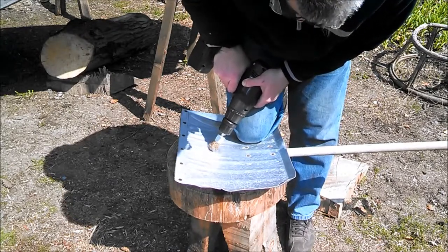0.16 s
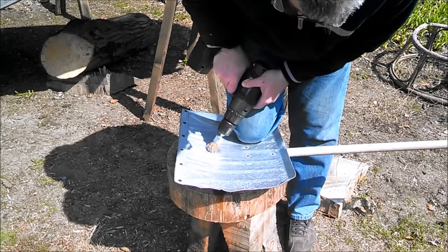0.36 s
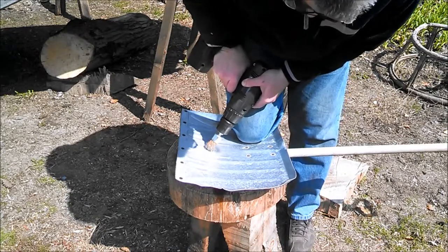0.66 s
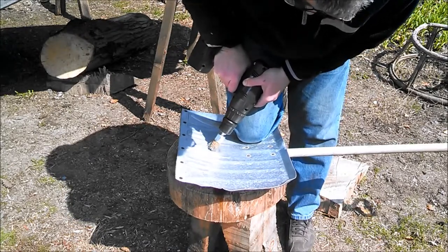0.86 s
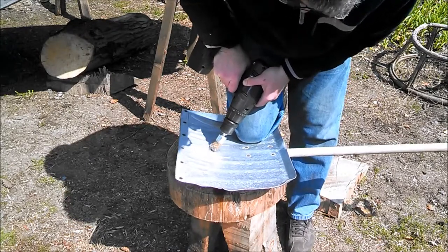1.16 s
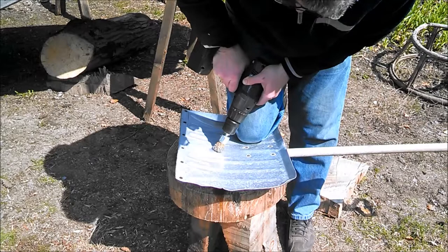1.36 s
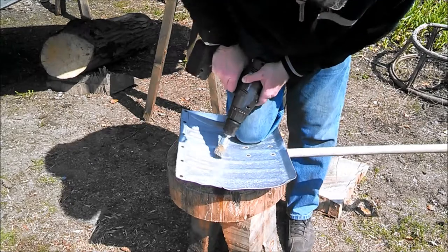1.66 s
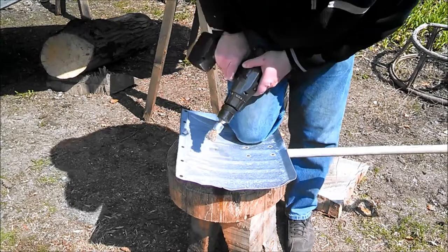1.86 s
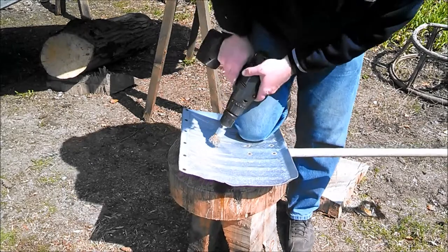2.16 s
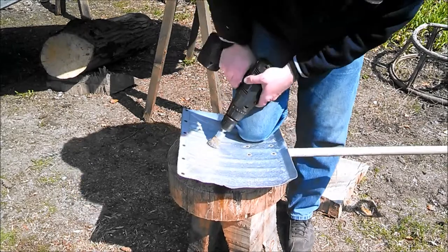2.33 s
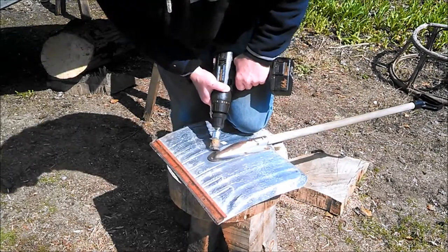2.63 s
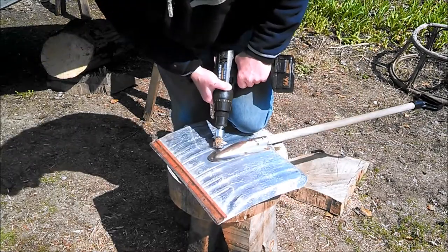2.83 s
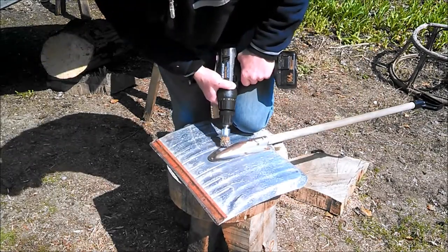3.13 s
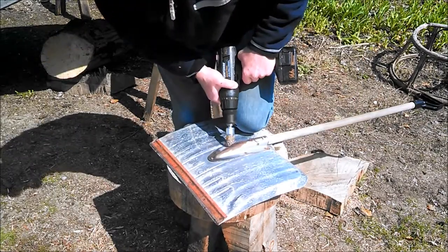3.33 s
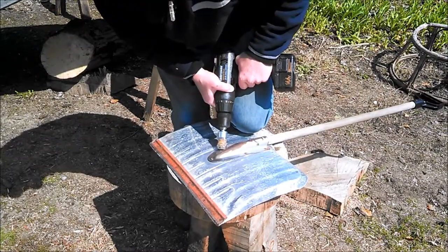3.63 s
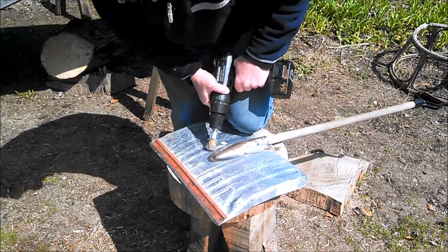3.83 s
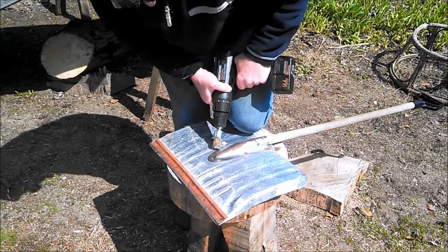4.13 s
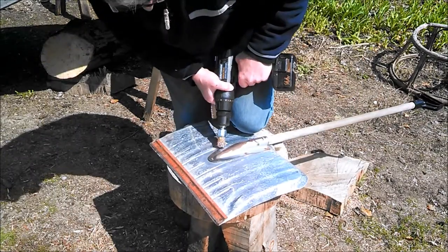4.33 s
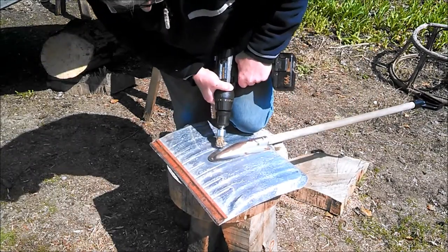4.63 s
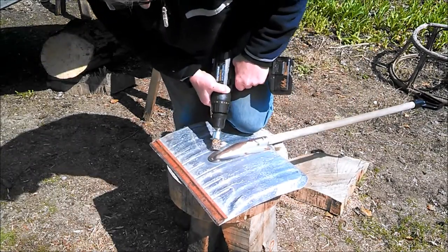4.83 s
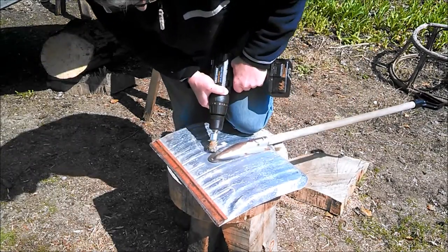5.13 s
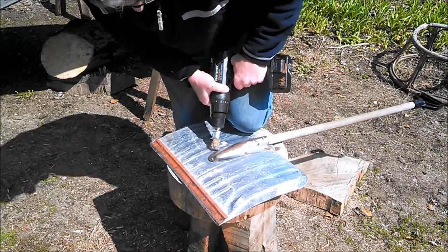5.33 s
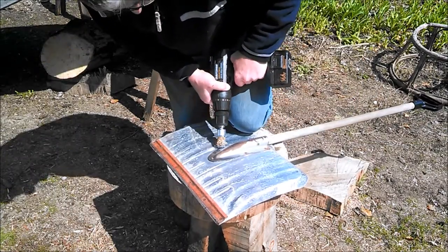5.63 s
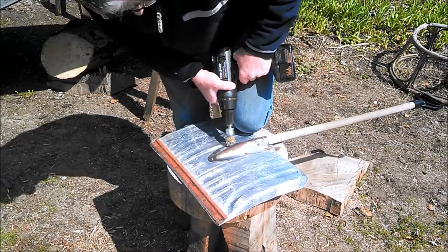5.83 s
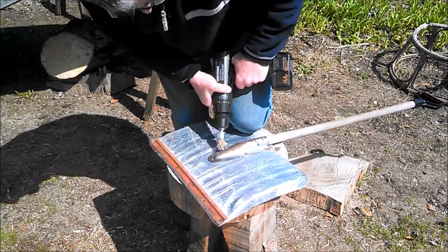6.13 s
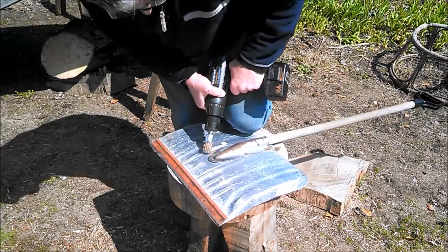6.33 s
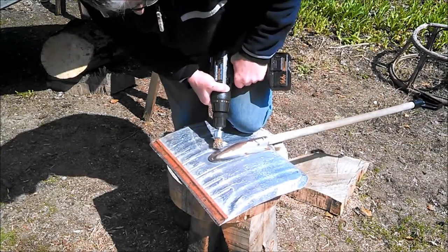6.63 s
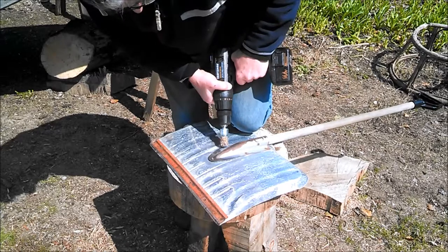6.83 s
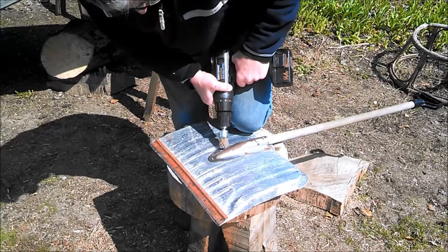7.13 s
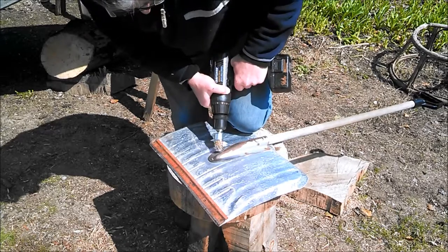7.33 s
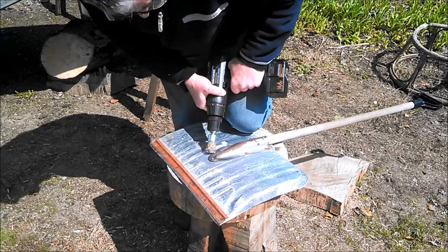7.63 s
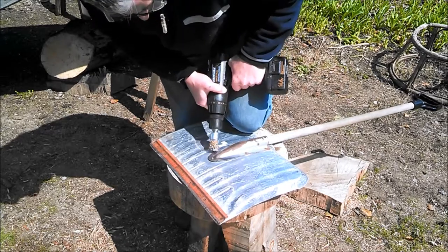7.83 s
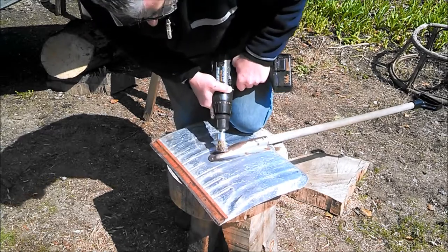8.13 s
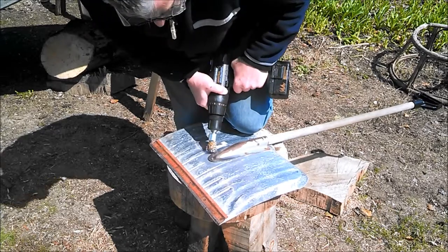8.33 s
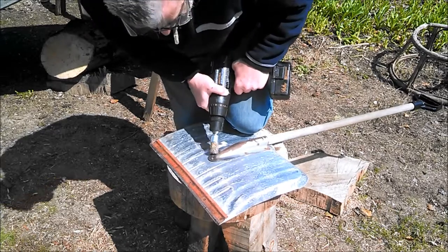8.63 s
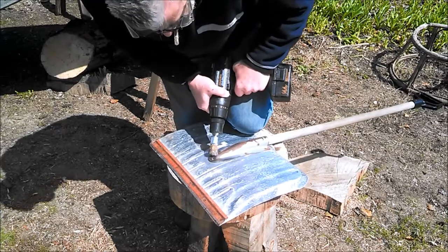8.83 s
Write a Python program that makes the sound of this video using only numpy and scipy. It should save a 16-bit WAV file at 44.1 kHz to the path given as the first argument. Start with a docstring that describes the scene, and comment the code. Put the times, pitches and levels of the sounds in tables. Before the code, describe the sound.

Close outdoors, a cordless drill drives a wire brush over a metal blade with a rough metallic ring and bright hiss. It races and stops briefly, leaving faint yard rumble and small rattles, then restarts. After an abrupt cut the brushing is denser and clangier, repeatedly slipping into a lighter, higher whine and biting again. Stereo microphones, dry, with level-evening gain.

```python
"""Outdoors, a cordless drill drives a wire brush over a metal shovel blade that lies on a stump.
At first tufts of wire strike the flat face, ringing its modes, while single wire tips hiss.
The trigger is let go and the work stops briefly; wires rustle, and the brush starts again on the face.
After a cut it works by the handle socket, where it bites, slips and skims while gear tones rise and sag.
A faint yard lies behind; a close pair of microphones with gain control listens throughout."""
import sys
import numpy as np
from scipy import signal
from scipy.fft import rfft, irfft, next_fast_len
from scipy.io import wavfile
from scipy.ndimage import uniform_filter1d, map_coordinates

SR = 44100
rng = np.random.default_rng(int(sys.argv[2]) if len(sys.argv) > 2 else 0)


def store_wav(level_fs):
    """Save 16-bit WAV to argv[1]."""
    pcm = np.round(np.clip(np.atleast_2d(level_fs), -1, 1) * 32767)
    wavfile.write(sys.argv[1], SR, pcm.T.astype(np.int16))


N = 396004
T = np.arange(N) / SR

# modes of the blade on its flat face: (centre [Hz], width [Hz], lift [dB])
FACE_MODES = [(184, 63, 16), (359, 18, 14), (494, 17, 5.8), (600, 67, 6.1), (742, 16, 10), (870, 65, 6.2),
              (945, 66, 6.7), (1332, 66, 7.5), (1506, 28, 4.5), (1730, 120, 7.8), (1990, 31, 3.7),
              (2150, 45, 9.6), (3330, 50, 1.8)]
# the brush slips off the socket and skims while the drill speeds up, then bites again:
# (slip [s], fastest [s], bite [s], top gear mesh rate [Hz])
SLIPS = [(3.115, 3.44, 3.765, 2050), (5.672, 5.87, 6.2, 1910), (6.93, 7.14, 7.365, 1868),
         (7.998, 8.1, 8.2, 2090), (8.395, 8.52, 9.0, 2080)]
# the brush is eased back from the metal: (start [s], end [s], ring change [dB], hiss change [dB])
LIFTS = [(1.608, 1.8, -16, -14.5), (3.81, 3.918, -9, -9), (4.33, 4.53, -2, 0.5), (4.94, 5.1, -2.5, -3),
         (5.3, 5.44, 0, -3.5), (6.258, 6.28, -8, -3), (6.308, 6.365, -5, -2), (7.45, 7.565, -11, -13.5),
         (7.68, 7.76, -4.5, -9), (8.03, 8.09, -16, -23), (8.09, 8.215, -1.5, -8), (8.26, 8.285, -16, -12),
         (8.452, 8.498, -12, -26), (8.498, 8.8, -1.5, -3.5)]

# the trigger is let go; the level is fully back at the restart; a cut leads to the socket
STOP_S, RESTART_S, SOCKET_FROM_S = 1.697, 2.238, 2.412
COAST_DB_PER_S, SPIN_UP_DB_PER_S, STILL_DB = 403, 1296, -59
# a change of contact comes in the first time; the lifted brush lands in the second
CONTACT_S, LANDING_S = 0.037, 0.021
# gear mesh rates: labouring against the socket, and skimming freely
LOADED_HZ, FREE_HZ = 1622, 1800
# after a slip the speed sags as the hand bears down; the bite then bogs the drill down
SAG_HZ_PER_S, BOG_S = 500, .07
# the ring returns just ahead of the loss of speed
SLIP_S, BITE_S, BITE_LEAD_S = .06, .13, .045
# skimming is quieter and grows with the pressure
SKIM_RING_DB, SKIM_HISS_DB = -12.5, -1.5
RING_GROWS_DB_PER_S, HISS_GROWS_DB_PER_S = 10, 5
# drive levels of steady brushing, ahead of the blade's resonances
FACE_RING_DB, FACE_HISS_DB = -28, -24
SOCKET_RING_DB, SOCKET_HISS_DB = -22, -27
# low boom and middle clang bands; by the socket the clang grows with the strength of the ring
BOOM_HZ, CLANG_HZ = (160, 322), (1085, 1500)
SOCKET_BOOM_DB, FACE_CLANG_DB, SOCKET_CLANG_DB, CLANG_PER_DB = 1.5, -0.5, 1, 0.16
# the wires chatter in short bursts; the skimming brush dabs at the metal once a turn
CHATTER_DB, CHATTER_PER_S, DAB_DB = 1.25, 110, 2.6
# speed waver and jitter are shares of the speed; skimming takes away up to SKIM_STEADIES of both
MESHES_PER_TURN, WAVER, JITTER, SKIM_STEADIES = 139.5, .013, .004, .7
JITTER_PER_S, ROUGH_DB = 60, 2.2   # rate of the jitter, and flutter of the tones in level
# the teeth run slack and quiet in a run-up: the full drop, and the run-up that gives it
SLACK_DB, SLACK_HZ_PER_S = -11, 3900
RATTLE_DB, SOCKET_RATTLE_DB = -25, -3   # gear rattle, and its change by the socket
# each spot on the blade favours other modes and detunes them (share of Hz)
SPOT_DB, SPOT_DETUNE, SPOTS_PER_S = 2.0, .004, 2.2
# weak modes lie densely between the main ones, lifted or cut by up to DENSE_DB
DENSE_SPACING_HZ, DENSE_WIDTH_HZ, DENSE_DB = 85, 20, 8.4
RUSTLE_FROM_S, RUSTLE_DB = 2.118, -49
CUTOFF_HZ, CEILING = 15600, .85


def amp(db):
    """Decibels to gain."""
    return 10 ** (np.asarray(db) / 20)


def rms_one(x):
    """Scale to unit power."""
    return x / np.sqrt(np.mean(x ** 2) + 1e-20)


def in_time(rows):
    """Each column of a curve, sample by sample."""
    s, *columns = np.transpose(rows)
    return [np.interp(T, s, c) for c in columns]


def drift(rate):
    """Smooth random wander of spread 1, made at a fortieth of the sample rate."""
    r = np.exp(-80 * np.pi * rate / SR)
    noise = rng.standard_normal(N // 40 + 2002)
    slow = signal.lfilter([1], [1, -2 * r, r * r], noise)[2000:]   # the start-up is dropped
    return np.interp(np.arange(N) / 40, np.arange(len(slow)), rms_one(slow))


def ramp(start_s, length_s):
    """Rise from 0 to 1 in a straight line."""
    return np.clip((T - start_s) / length_s, 0, 1)


def moments(rows, edge_s, back_s=None):
    """Sum of passing changes that come over edge_s and go over back_s, one curve a level column."""
    back_s = back_s or edge_s
    return sum(np.outer(levels, ramp(start - edge_s / 2, edge_s) - ramp(end - back_s / 2, back_s))
               for start, end, *levels in rows)


def band(x, edges_hz):
    """One gentle band of a sound."""
    return signal.sosfilt(signal.butter(1, edges_hz, "band", fs=SR, output="sos"), x)


def wander(x, depth_s, rate):
    """A slowly changing delay, which bends every pitch a little."""
    return map_coordinates(x, [(T + depth_s * drift(rate)) * SR], order=3)


def peaks_db(modes, hz):
    """Lift in dB that a set of resonances gives at these frequencies."""
    return sum(db / (1 + (2 * (hz - centre) / width) ** 2) for centre, width, db in modes)


def body(drive, colour, modes=(), size=8192):
    """Pass a drive through a causal filter of unit power with this colour and these resonances."""
    hz = np.maximum(np.fft.rfftfreq(size, 1 / SR), 1)
    points, levels = np.transpose(colour)
    colour_db = np.interp(np.log(hz), np.log(points), levels)
    cepstrum = irfft(np.log(amp(colour_db + peaks_db(modes, hz))))
    cepstrum[1:size // 2] *= 2      # minimum phase: ringing only follows its cause
    cepstrum[size // 2 + 1:] = 0
    response = irfft(np.exp(rfft(cepstrum)))
    return signal.oaconvolve(drive, response / np.linalg.norm(response))[:N]


def strikes(per_s, spread_db):
    """Wire tips hitting at random with uneven force; rms 1."""
    force = amp(spread_db * np.minimum(rng.exponential(1, N), 4)) * rng.choice([-1, 1], N)
    return rms_one(force * (rng.random(N) < per_s / SR))


def yard(level_db=-47.0):
    """Outdoor rumble and a faint far hum: noise through a broad colour with narrow resonances."""
    # rumble: (frequency [Hz], level [dB])
    yard_colour = [(20, -30), (40, -7), (58, -4), (88, -6), (125, -12), (300, -20), (700, -23),
                   (1400, -20.5), (2300, -32), (3800, -27), (7000, -38), (15000, -48)]
    # hum: (centre [Hz], width [Hz], lift [dB])
    far_hum = [(453, 15, 15), (795, 14, 9), (855, 16, 12), (1200, 16, 8.9), (1290, 14, 5.7)]
    waver_db = 1.5 * drift(5.8)
    return amp(level_db + waver_db) * body(rng.standard_normal(N), yard_colour, far_hum)


def breeze(level_db=-65, gust_db=-4.0):
    """Light air stirs at each microphone on its own, as low noise that swells and fades."""
    # air on the microphones: (frequency [Hz], level [dB])
    air_colour = [(20, 0), (60, -8), (150, -12), (500, -36), (4000, -70)]
    return np.array([amp(level_db + gust_db * drift(3.3)) * body(rng.standard_normal(N), air_colour)
                     for _ in range(2)])


def rustle():
    """The wires rustle softly, in sparse strikes, as the brush is set down and begins to turn."""
    # rustling wires: (frequency [Hz], level [dB])
    rustle_colour = [(500, 0), (2500, -4), (3800, 0), (5500, -9), (7000, -8), (14000, -35)]
    touching = ramp(RUSTLE_FROM_S, CONTACT_S) * (T < RESTART_S)
    return amp(RUSTLE_DB) * body(touching * strikes(per_s=2200, spread_db=3), rustle_colour)


def knocks(level_db=1.0, ring=0.28):
    """Each knock is a quick, dry rattle of metal, decaying noise that barely rings the blade."""
    # chuck stopping and starting, brush landing or catching:
    # (time [s], relative level [dB], time to decay by 60 dB [s])
    knock_rows = [(.767, -7, .03), (1.7213, -10.5, .022), (2.131, -39, .015), (2.1355, -25, .011),
                  (2.161, -36, .015), (2.178, -34, .012), (2.196, -40, .025), (2.2368, 0, .014),
                  (2.461, 3, .02), (7.616, -2, .02), (8.499, -16, .03), (8.625, -13, .03),
                  (8.926, -7, .025)]
    # rattling metal: (frequency [Hz], level [dB])
    knock_colour = [(100, -40), (400, -6), (700, 5), (1200, 6), (1800, -10), (2700, 6), (4500, -1),
                    (7000, -10), (10000, -15), (15000, -27)]
    force = np.zeros(N)
    for s, db, t60 in knock_rows:
        force += (T >= s) * amp(db - 60 * np.maximum(T - s, 0).clip(0, 1) / t60)
    faint_modes = [(hz, width, ring * db) for hz, width, db in FACE_MODES]
    return amp(level_db) * body(force * rng.standard_normal(N), knock_colour, faint_modes)


def squeals(jitter=0.0051):
    """The wires stick and slip in step with one mode, which sings out for a moment."""
    # singing modes: (start [s], end [s], frequency [Hz], level before flutter [dB])
    squeal_rows = [(.752, .785, 1735, -20), (3.2, 3.74, 733, -34), (4.12, 4.17, 3990, -22),
                   (4.21, 4.33, 2255, -23), (4.785, 4.85, 1775, -18), (6.275, 6.305, 4010, -18),
                   (6.45, 6.53, 2175, -21)]
    bend = np.cumsum(1 + jitter * drift(JITTER_PER_S)) / SR
    tones = np.zeros(N)
    for start, end, hz, db in squeal_rows:
        swell = moments([(start, end, amp(db))], CONTACT_S)[0]
        tones += swell * np.sin(2 * np.pi * hz * bend)
    return tones * amp(ROUGH_DB * drift(JITTER_PER_S))


def drone(width_hz=22):
    """One strong mode of the blade, kept ringing by the brush, shifts as it travels over the face."""
    # the shifting mode: (time [s], frequency [Hz], level [dB])
    drone_curve = [(0, 555, -37), (.25, 557, -32), (.6, 550, -30.5), (.72, 560, -42), (1.12, 595, -40),
                   (1.22, 600, -31), (1.44, 598, -26), (1.62, 600, -37)]
    hz, level_db = in_time(drone_curve)
    phase = 2 * np.pi * np.cumsum(hz) / SR
    ringing = drift(width_hz) * np.cos(phase) + drift(width_hz) * np.sin(phase)
    return amp(level_db) * ringing * (T < drone_curve[-1][0])


def running_db():
    """Everything dies away when the trigger is let go and returns as the drill spins up."""
    coast = np.clip(-COAST_DB_PER_S * (T - STOP_S), STILL_DB, 0)
    return np.maximum(coast, np.clip(SPIN_UP_DB_PER_S * (T - RESTART_S), STILL_DB, 0))


def bog(bite_s):
    """Share of the spare speed that is left after the brush bites."""
    return np.exp(-np.maximum(T - bite_s, 0) / BOG_S)


def speed():
    """Gear mesh rate: the drill runs up at each slip, sags under the hand, labours after the bite."""
    # drill on the flat face, racing before the stop: (time [s], gear mesh rate [Hz])
    face_speed = [(0, 1808), (.2, 1838), (.68, 1785), (.87, 1800), (.95, 1735), (1.07, 1688), (1.22, 1600),
                  (1.32, 1635), (1.41, 1720), (1.46, 1880), (1.57, 2030), (1.65, 2650), (1.72, 2680),
                  (1.8, 600), (2.14, 600), (2.24, 1490), (2.38, 2081)]
    socket_hz = LOADED_HZ
    for slip, fastest, bite, top_hz in SLIPS:
        run_up = np.sin(np.pi / 2 * ramp(slip, fastest - slip))
        spare_hz = top_hz - LOADED_HZ - SAG_HZ_PER_S * np.maximum(T - fastest, 0)
        socket_hz = socket_hz + spare_hz * run_up * bog(bite)
    face_hz, = in_time(face_speed)
    return socket_hz + (face_hz - socket_hz) * bog(SOCKET_FROM_S)


def gears(mesh_hz, turn, at_socket, swell_s=0.097, unload=0.79):
    """Meshing teeth whine and rattle, swelling in the housing resonances and wavering once a turn."""
    # drill housing, which the tones sweep through: (centre [Hz], width [Hz], lift [dB])
    housing = [(1700, 930, 17), (3610, 210, 6.5), (3860, 910, 10), (4980, 590, 13.5)]
    # tones: (multiple of the mesh rate, base level on the face [dB], base level by the socket [dB])
    gear_tones = [(1, -33.5, -44), (2, -34, -37), (3, -28.5, -39), (4, -32, -40)]
    # the whine swells or fades as the load changes:
    # (start [s], end [s], change of mesh tone and rattle [dB], change of octave tone [dB])
    whines = [(.88, 1.07, -1, -5), (1.12, 1.34, -6, -4), (1.44, 1.65, -3, 0), (2.27, 2.42, 5, 4),
              (3.18, 3.72, 0, 8), (3.42, 3.66, 4, 0), (3.66, 3.95, 12.5, -2), (4.27, 4.66, 0, 7),
              (5.7, 6.26, 3, -10), (5.93, 6.24, 8, 0), (6.99, 7.38, 11.5, -14), (8.0, 8.7, 1, -1),
              (8.7, 9.0, 6, -3)]
    # teeth rattling in the housing: (centre [Hz], width [Hz], lift [dB])
    rattle_modes = [(1840, 110, 14.5)]
    # the rattle's colour: (frequency [Hz], level [dB])
    rattle_colour = [(700, -23.5), (1900, -0.5), (3500, -23)]
    skimming = at_socket * np.clip((mesh_hz - LOADED_HZ) / (FREE_HZ - LOADED_HZ), 0, 1)
    waver = (1 - SKIM_STEADIES * skimming) * (WAVER * turn + JITTER * drift(JITTER_PER_S))
    phase = 2 * np.pi * np.cumsum(mesh_hz * (1 + waver)) / SR
    mesh_db, octave_db = moments(whines, swell_s)
    rattle_db = RATTLE_DB + SOCKET_RATTLE_DB * at_socket + mesh_db
    out = body(amp(rattle_db) * rng.standard_normal(N), rattle_colour, rattle_modes)
    for (multiple, face_db, socket_db), lift_db in zip(gear_tones, (mesh_db, octave_db, 0, 0)):
        level_db = face_db + (socket_db - face_db) * at_socket
        level_db = level_db + peaks_db(housing, multiple * mesh_hz) + lift_db
        out += amp(level_db + ROUGH_DB * drift(JITTER_PER_S)) * np.sin(multiple * phase)
    run_up = uniform_filter1d(np.gradient(mesh_hz) * SR, size=1024)
    slack_db = SLACK_DB * np.clip(run_up / SLACK_HZ_PER_S, 0, 1)
    _, eased_db = moments(LIFTS, CONTACT_S)
    return out * amp(running_db() + unload * eased_db + slack_db)


def skim(slip, bite):
    """How far the brush skims in one slip: 1 after it slips, 0 once it bites."""
    return ramp(slip, SLIP_S) * (1 - ramp(bite - BITE_LEAD_S, BITE_S))


def contact(at_socket):
    """Ring, hiss, boom and clang in dB, from how the brush bears on the metal."""
    # the wires bear harder, softer or elsewhere for a moment, changing the tone: (start [s], end [s],
    # ring change [dB], hiss change [dB], low boom change [dB], middle clang change [dB])
    bearing_changes = [(.25, .4, 1.5, 1.5, 3.5, 2.5), (.56, .68, 1.5, 0.5, -2, 3),
                       (.76, .785, 5, -1, -4, -1), (1.335, 1.595, 4.5, -1.5, 0, 0),
                       (2.255, 2.41, 1, 1, -2, 0), (2.412, 2.475, -0.5, 3, 8, 7.5),
                       (3.705, 3.73, 9.5, 0, -4, -10), (3.765, 3.803, 8, 3.5, -15, -5),
                       (3.928, 3.965, 2, 0.5, 1, 4), (4.08, 4.32, 0.5, 0.5, 0, 1.5),
                       (4.68, 4.92, 0.5, -1, 1, 2), (5.14, 5.27, 0, 0, 6.5, 6), (5.47, 5.58, 0, 0, 5.5, 7),
                       (5.58, 5.71, -1.5, -0.5, 3.5, -1.5), (6.228, 6.252, 4, 2.5, 7, -13),
                       (6.283, 6.303, 3, 2, -21, 0), (6.375, 6.43, 1.5, 4, -3, 4),
                       (6.43, 6.56, 1.5, -0.5, -2, 2), (6.56, 6.92, 0.5, -0.5, -1, -2.5),
                       (7.4, 7.435, 0.5, -1, 0, 4), (7.47, 7.575, -7, 11, 12.5, 21.5),
                       (7.575, 7.65, -1.5, 2, 3, 11.5), (7.8, 7.93, 0, -2.5, 5, 3),
                       (7.965, 8.005, -1.5, -3, 1, 8.5), (8.222, 8.255, 4.5, 2, 2, 6.5),
                       (8.3, 8.395, 0, -1.5, 3, 3.5), (8.92, 8.94, 0, -7, 22, -13)]
    ring, hiss, boom, clang = moments(bearing_changes, CONTACT_S)
    lift_ring, lift_hiss = moments(LIFTS, CONTACT_S, LANDING_S)
    ring, hiss = ring + lift_ring, hiss + lift_hiss
    for slip, _, bite, _ in SLIPS:
        skimming = skim(slip, bite)
        ring = ring + skimming * (SKIM_RING_DB + RING_GROWS_DB_PER_S * (T - slip))
        hiss = hiss + skimming * (SKIM_HISS_DB + HISS_GROWS_DB_PER_S * (T - slip))
    on_face = 1 - at_socket
    return (ring + on_face * FACE_RING_DB + at_socket * SOCKET_RING_DB + running_db(),
            hiss + on_face * FACE_HISS_DB + at_socket * SOCKET_HISS_DB + running_db(),
            boom + at_socket * SOCKET_BOOM_DB,
            clang + on_face * FACE_CLANG_DB + at_socket * (SOCKET_CLANG_DB + CLANG_PER_DB * ring))


def spots(count=8):
    """Share of the brush's force on each of a row of neighbouring spots as it travels the blade."""
    place = (SPOTS_PER_S * T + .4 * drift(2)) % count
    away = [np.abs((place - k + count / 2) % count - count / 2) for k in range(count)]
    return [np.sqrt(np.maximum(1 - d, 0)) for d in away]


def spot_modes(modes, count=90):
    """The resonances as one spot excites them: the main modes a little changed, and many weak ones."""
    main = [(hz * (1 + SPOT_DETUNE * rng.standard_normal()), width, db + SPOT_DB * rng.standard_normal())
            for hz, width, db in modes]
    dense_hz = DENSE_SPACING_HZ * (np.arange(count) + rng.random(count)) + BOOM_HZ[1]
    return main + [(hz, DENSE_WIDTH_HZ, DENSE_DB * rng.uniform(-1, 1)) for hz in dense_hz]


def travelling(drive, colour, modes):
    """Ring the blade spot after spot, so that its partials swell, fade and waver."""
    return sum(body(drive * share, colour, spot_modes(modes)) for share in spots())


def brush(turn, at_socket, skip_db=1.04, flutter_db=0.52):
    """Skipping, chattering tufts ring the blade and single wires hiss; skimming dabs once a turn."""
    # overall colour of the blade in each place: (frequency [Hz], level [dB])
    face_colour = [(60, -17), (140, -19.5), (300, -9), (430, -15.5), (520, 2), (750, -2), (1000, 4.5),
                   (1600, 3), (2500, 3), (4000, -3.5), (8000, -11), (15000, -45)]
    socket_colour = [(60, -47), (150, -12), (220, -9.5), (390, -8.5), (470, 0.5), (780, -4.5), (1020, 2),
                     (1550, -1), (2100, 0), (2700, -3), (4000, -4), (6000, -3.5), (10000, -11),
                     (15000, -32)]
    # blade modes by the socket: (centre [Hz], width [Hz], lift [dB])
    socket_modes = [(231.7, 17, 11.4), (299, 16.4, 5.2), (335, 38, 3), (457.7, 31.5, 8.4), (495.5, 21, 9.3),
                    (528, 49, 12.5), (574, 15, 6.6), (665, 34, 9.8), (735, 40, 9.3), (833.4, 45, 11.5),
                    (895.5, 42, 12.5), (930.7, 13.8, 13.7), (966.4, 35, 9), (1026, 12, 5.5),
                    (1108, 27, 9.9), (1162, 25, 6.4), (1238, 13, 6.3), (1281, 27, 10.4), (1344, 23, 6.7),
                    (1430, 17, 7.3), (1577, 84, 4.3), (1907, 70, 4), (1954, 59, 9.8), (2157, 27, 7.2),
                    (2280, 65, 14), (2442, 50, 8.4), (2502, 72, 10.5), (3146, 185, 14.6), (3580, 53, 5.5),
                    (3700, 42, 5.8), (3824, 45, 7.4), (3966, 59, 14), (4337, 25, 15), (4570, 79, 7.3),
                    (4730, 34, 1.8)]
    # hiss of the wire tips in each place: (frequency [Hz], level [dB])
    face_hiss = [(500, -10.5), (2000, -6.5), (3500, 6), (4400, 1.5), (5000, 9.5), (7000, 7.5), (8500, 6),
                 (9900, -0.5), (11100, -7.5), (12800, -1.5), (14000, -13), (15500, -15)]
    socket_hiss = [(500, -6), (2000, -1.5), (3500, 7.5), (5000, 4.5), (6200, 1), (7400, 6.5), (9000, 1.5),
                   (10000, -15), (12000, -1), (14000, -10.5), (15500, -20.5)]
    # the wires' own resonances in each place: (centre [Hz], width [Hz], lift [dB])
    face_wire_modes = [(3790, 78, 6), (4140, 78, 9.5), (4580, 70, 5), (6300, 70, 0.5), (6690, 90, 1)]
    socket_wire_modes = [(4330, 35, 2.1), (4870, 160, 3.2), (5750, 870, 9.5), (6680, 180, 3.2),
                         (8700, 190, 6.4), (8100, 73, 1.1), (10110, 1230, 12)]
    blade_db, hiss_db, boom_db, clang_db = contact(at_socket)
    skip, chatter_db = drift(14.2), CHATTER_DB * drift(CHATTER_PER_S)
    dab_db = DAB_DB * turn * sum(skim(slip, bite) for slip, _, bite, _ in SLIPS)
    tufts = strikes(per_s=5000, spread_db=2.0) * amp(blade_db + dab_db + skip_db * skip + chatter_db)
    boom = (amp(boom_db) - 1) * band(tufts, BOOM_HZ)
    clang = (amp(clang_db) - 1) * band(tufts, CLANG_HZ)
    tufts = tufts + boom + clang
    wires = strikes(per_s=7500, spread_db=1.1) * amp(hiss_db + flutter_db * skip + chatter_db)
    face = amp(13.5) * body(tufts * (1 - at_socket), face_colour, FACE_MODES)
    face += amp(13.5) * body(wires * (1 - at_socket), face_hiss, face_wire_modes)
    socket = amp(12.5) * travelling(tufts * at_socket, socket_colour, socket_modes)
    socket += amp(12.0) * travelling(wires * at_socket, socket_hiss, socket_wire_modes)
    return face + socket


def scatter(x, t60=0.06):
    """Arms, logs and ground add short sprays of echoes, front and sides, that shift as the tool moves."""
    t = T[:SR // 4]
    echoes = rng.standard_normal((2, len(t))) * amp(-60 * t / t60) * (t > .003)
    echoes = signal.sosfilt(signal.butter(1, 500, "high", fs=SR, output="sos"), echoes)
    sprays = []
    for echo in echoes:
        spray = signal.oaconvolve(x, echo / np.linalg.norm(echo))[:N]
        sprays.append(wander(spray, depth_s=.0005, rate=2))
    return x + amp(-8.5) * np.array(sprays)


def microphones(field, diffuse_db=-13):
    """The capsules' phase gap varies with frequency, so sum and difference take turns at cancelling."""
    # phase by which the left microphone leads the right: (frequency [Hz], phase [radians])
    pair_phase = [(0, -2.9), (45, -2.65), (90, -2.2), (190, -1.25), (330, -.65), (600, -.38), (1000, -.22),
                  (1450, 0), (2100, 1.3), (2780, 3.14), (5530, 9.42), (16570, 34.56)]
    # left minus right: (frequency [Hz], level [dB])
    pair_balance = [(60, 0), (200, 1.2), (330, 1.5), (500, 1.3), (700, 2.5), (1000, 1.5), (1400, 0),
                    (2000, -3), (2350, -2.5), (2650, 0), (2900, 0), (3200, 2), (4000, 0)]
    size = next_fast_len(N + SR // 10)
    hz = np.fft.rfftfreq(size, 1 / SR)
    lead = np.interp(hz, *np.transpose(pair_phase))
    lean = amp(np.interp(hz, *np.transpose(pair_balance)) / 2)
    front, sides = rfft(field, size)
    mid, side = front * np.cos(lead / 2), 1j * sides * np.sin(lead / 2)
    side = side + amp(diffuse_db) * (sides - front)     # stray echoes reach the two capsules unlike
    return irfft(np.array([(mid + side) * lean, (mid - side) / lean]), size)[:, :N]


def scene(work_db=3.5):
    """Drill, brush and blade close by, the yard behind."""
    mesh_hz, at_socket = speed(), ramp(SOCKET_FROM_S, LANDING_S)
    # the brush runs slightly off centre
    turn = np.cos(2 * np.pi * np.cumsum(mesh_hz) / MESHES_PER_TURN / SR)
    work = rustle() + knocks() + squeals() + drone()
    work = work + gears(mesh_hz, turn, at_socket) + brush(turn, at_socket)
    return microphones(scatter(amp(work_db) * work) + yard()) + breeze()


def record(dry, threshold_db=-49.0, slope=0.39, most_db=15.5):
    """Gain control turns loud sound down, so the yard rises in the pause; peaks are rounded, top cut."""
    power = np.abs(uniform_filter1d(np.mean(dry ** 2, axis=0), size=1024))
    level_db = 10 * np.log10(power + 1e-12)
    held = dry * amp(-np.clip(slope * (level_db - threshold_db), 0, most_db))
    held = held / (1 + (held / CEILING) ** 4) ** .25
    return signal.sosfilt(signal.ellip(12, .1, 80, CUTOFF_HZ, fs=SR, output="sos"), held)


dry = scene()
out = record(dry)
store_wav(out)
```